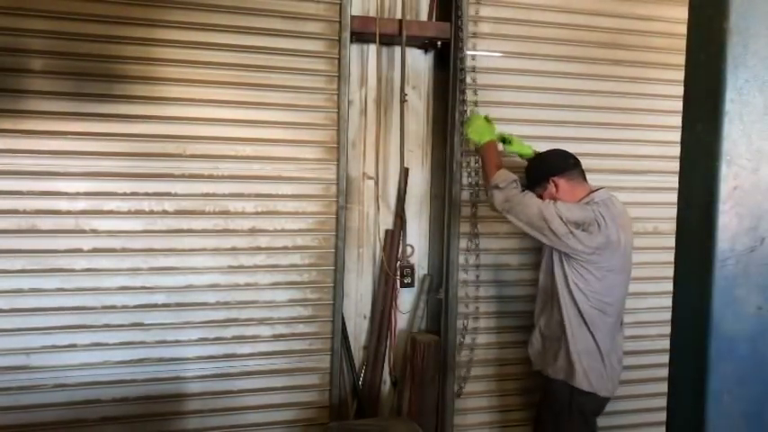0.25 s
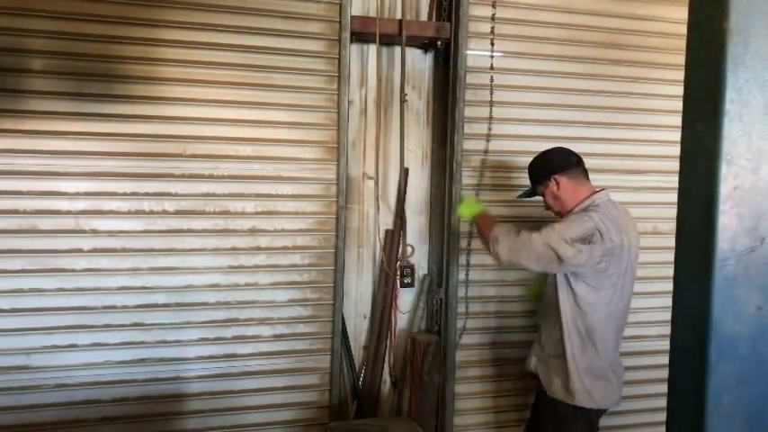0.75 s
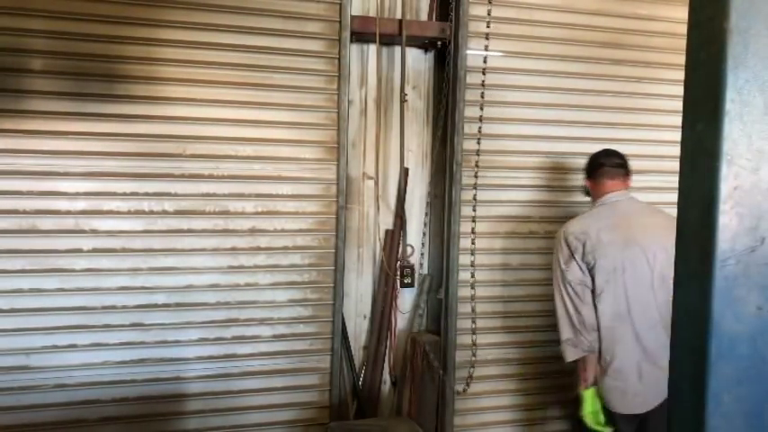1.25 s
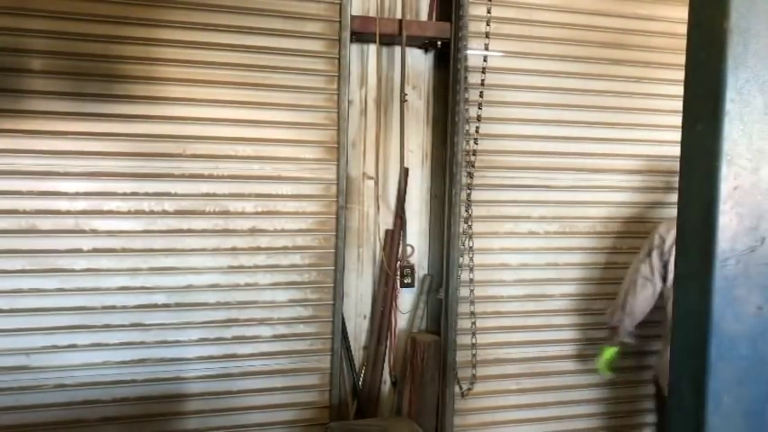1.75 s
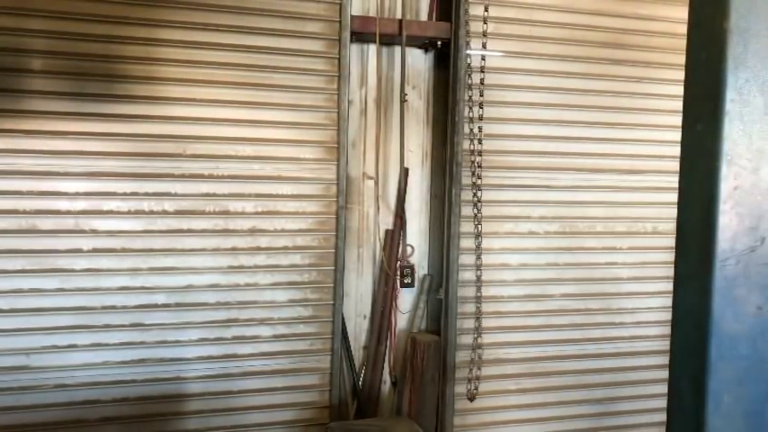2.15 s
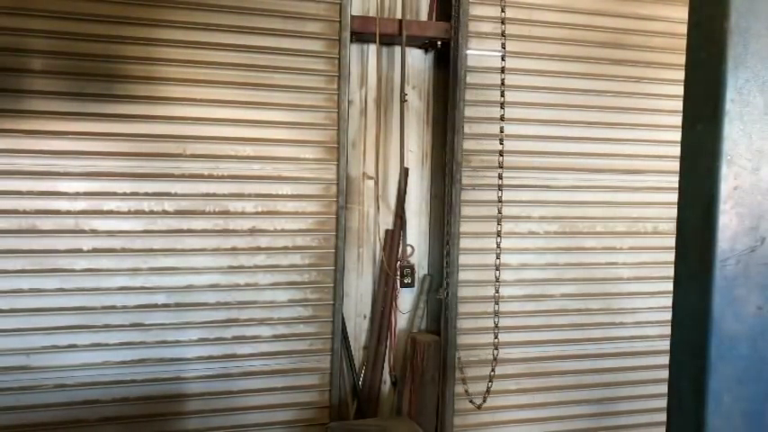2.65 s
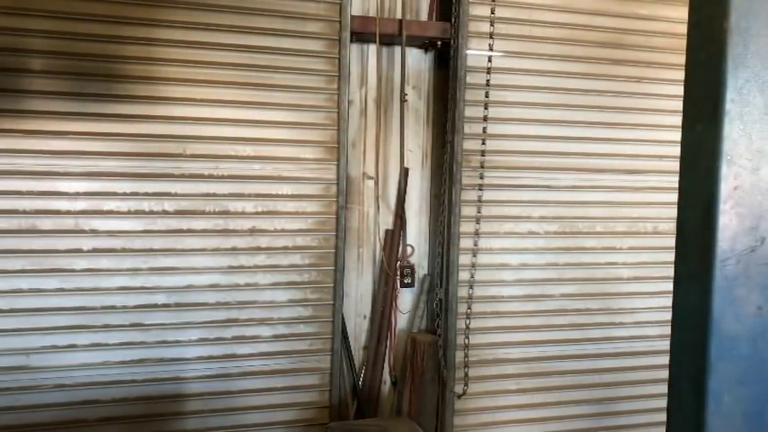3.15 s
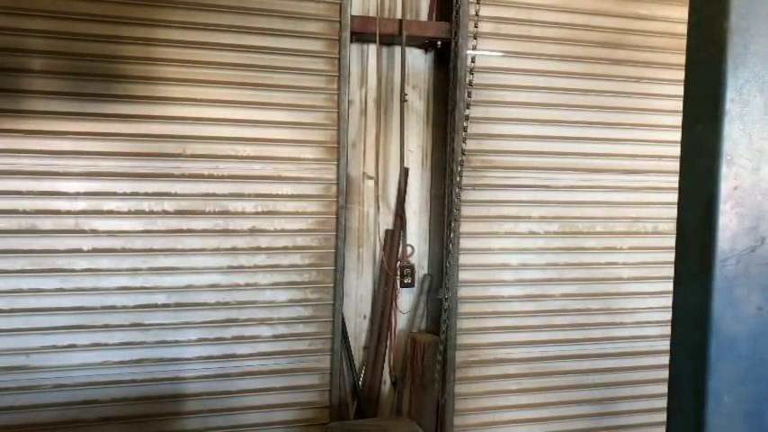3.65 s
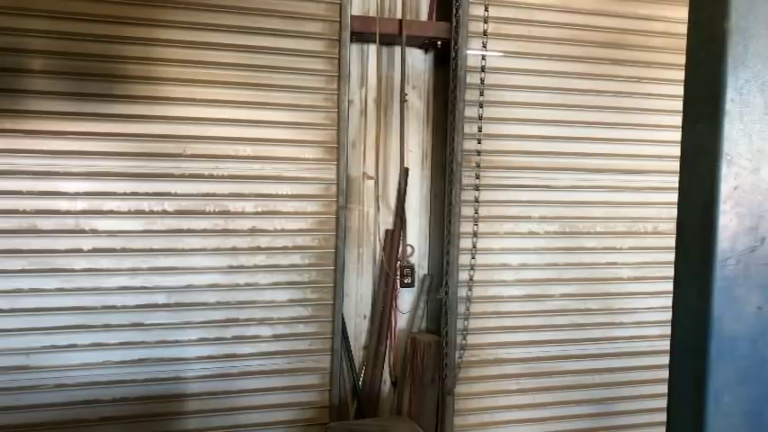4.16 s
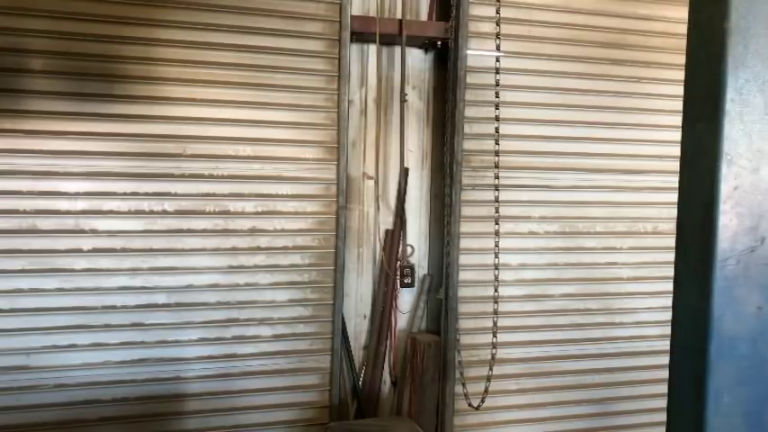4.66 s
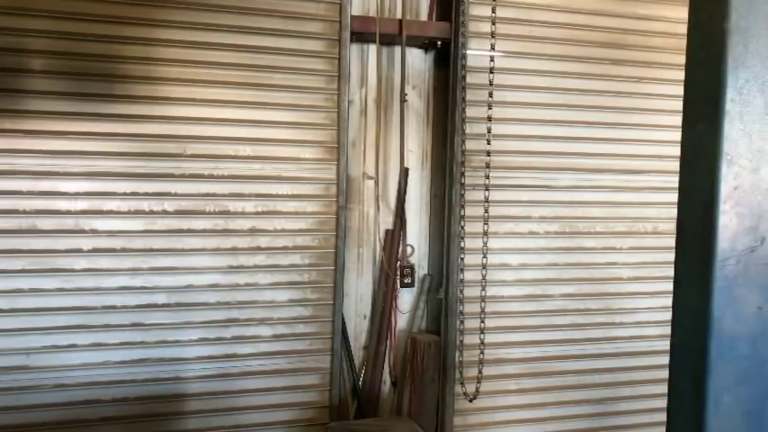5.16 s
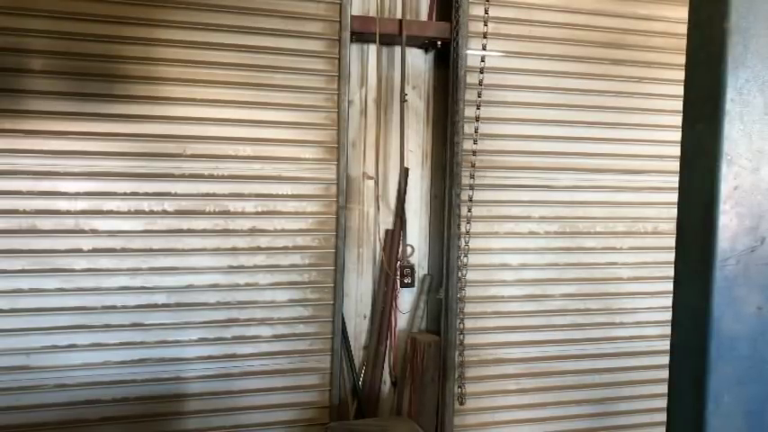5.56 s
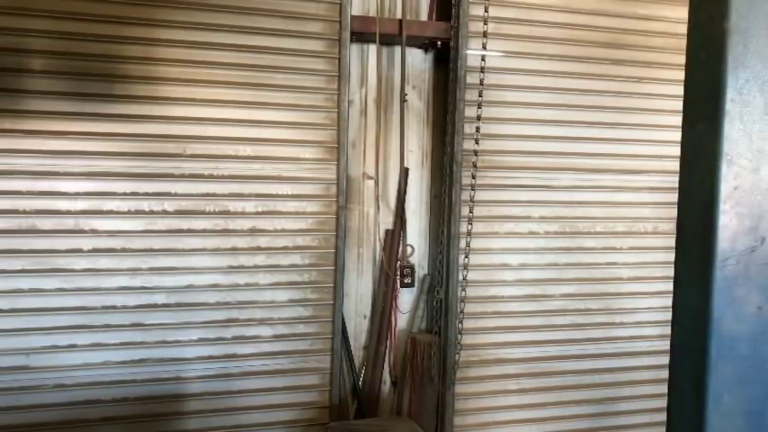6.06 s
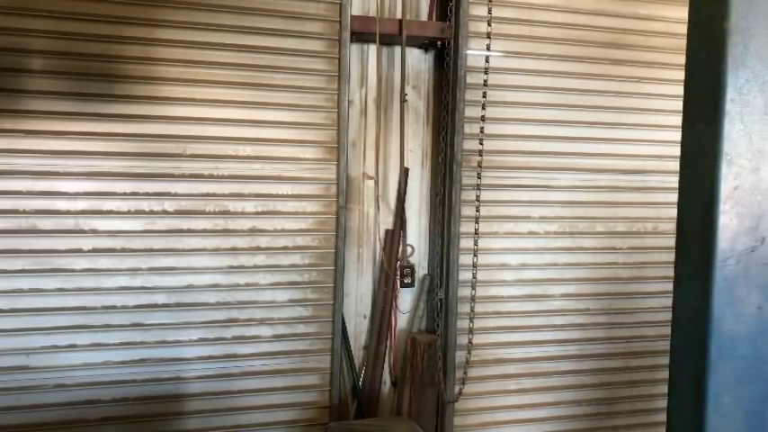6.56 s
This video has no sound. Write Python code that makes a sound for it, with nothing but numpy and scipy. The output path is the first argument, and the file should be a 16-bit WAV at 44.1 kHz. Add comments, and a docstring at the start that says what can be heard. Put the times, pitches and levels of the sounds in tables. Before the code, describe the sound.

Heavy metal shutter clatter fades quickly, a swinging chain gives isolated clanks in near quiet, then a booming microphone bump with small rattles ends it.

```python
"""A corrugated steel door, just hauled down, rumbles and settles: noise and knocks through sheet resonances.
Its loose hand chain swings on in an echoing garage: bursts of contacts slap the sheet, ring rail and links;
noise bursts through single resonances squeak, knock or swish, over a wavering sine hum and coloured air noise.
At the end a cut to a quiet shop: a hand bumps the microphone, whose mount wobbles as dying sines,
and something small rattles as short resonant noise bursts, over hiss."""
import sys
import numpy as np
from scipy import signal
from scipy.io import wavfile
from scipy.ndimage import uniform_filter1d

SR = 44100
rng = np.random.default_rng(int(sys.argv[2]) if len(sys.argv) > 2 else 0)


def file_out(sig):
    """Save sig as 16-bit WAV at sys.argv[1]."""
    # one column per channel
    cols = np.atleast_2d(sig).T
    # limit, then scale
    lim = np.clip(cols, -1, 1)
    pcm = np.round(lim * 32767).astype(np.int16)
    wavfile.write(sys.argv[1], SR, pcm)


def amplitude_ratio(level_db):
    """Convert a level in decibels to the matching linear amplitude (field) ratio."""
    exponent = np.asarray(level_db, float) / 20
    return 10 ** exponent


N = 300762

# shaking of the slats: [t/s, level/dB]
DOOR_SHAKE = [(0.0, -11.5), (0.09, -15.5), (0.16, -13.5), (0.27, -17), (0.38, -20), (0.5, -22),
              (0.57, -18.5), (0.66, -25.5), (0.79, -22), (0.9, -24.5), (1.19, -31), (1.3, -30),
              (1.55, -39.5), (1.71, -45), (1.83, -35), (1.94, -43.5), (2.03, -42), (2.12, -46)]
# spectrum of the heavy boom: [f/Hz, level/dB]
BOOM_SPECTRUM = [(8.8, -51), (15, -38), (34, -19.5), (59, -4), (92, -9), (172, -7.5), (200, -14),
                 (260, -34), (440, -120)]
# sheet resonances: [f/Hz, width/Hz, level/dB]
SLAT_MODES = [(162, 120, -1), (250, 15, 3.5), (316.4, 27, 0), (401, 43, -1), (546, 73, -1), (679, 115, 0),
              (747, 77, 1.5), (913, 110, -6), (1069, 35, -5)]
# spectrum of the clatter of slats and shivering links: [f/Hz, level/dB]
CLATTER_SPECTRUM = [(500, -24.5), (1100, 0.5), (2000, -3.5), (4000, -12), (7000, -23.5), (10500, -26),
                    (16000, -30)]
# chain against rail or door: [t/s, blow level/dB, sheet thud over blow/dB, length/s]
CHAIN_SLAPS = [(0.002, -14.5, -3, 0.045), (0.166, -22, 5.5, 0.042), (0.199, -21.5, 3, 0.011),
               (0.225, -18, 10, 0.037), (0.25, -26.5, 1, 0.022), (0.398, -28.5, 2, 0.2),
               (0.596, -34, 8, 0.045), (0.665, -27.5, 5.5, .012), (0.798, -29.5, -11, 0.037),
               (0.824, -21, 0, 0.064), (1.068, -44.5, 11, 0.015), (1.227, -45, 9.5, 0.028),
               (1.288, -49.5, 5, 0.025), (1.33, -46.5, 10, 0.014), (1.557, -48, 10, 0.051),
               (1.627, -54, -2, 0.077), (1.764, -41, -10.5, 0.014), (1.827, -52.5, 4, 0.019),
               (1.973, -52.5, 19, 0.011), (2.099, -50.5, -5.5, 0.035), (2.185, -52.5, -4, 0.061),
               (2.243, -50, 2, 0.034), (2.485, -23, -10, 0.071), (2.906, -49.5, 2, 0.035),
               (3.118, -46.5, 0, .07), (3.159, -51, 7.5, 0.053), (3.259, -45, 3, 0.0288),
               (3.415, -50, -1.5, 0.062), (3.464, -51.5, -5.5, 0.046), (3.562, -48.5, 5, .015),
               (3.61, -50, 2, 0.022), (3.717, -52, 6, 0.035), (3.74, -50.5, -3, 0.047),
               (3.779, -50.5, 6.5, 0.043), (3.933, -57.5, -1, 0.13), (4.021, -30, 0.5, 0.046),
               (4.064, -17, -1.5, 0.016), (4.079, -28.5, -8.5, 0.036), (4.507, -55, 9, 0.033),
               (4.638, -64.5, -2.5, 0.0276), (5.079, -54, -5.5, 0.05), (5.175, -66.5, -6.5, 0.06),
               (5.273, -60, -5.5, 0.045), (5.553, -64, 0, 0.049), (5.677, -60, 2, 0.058),
               (5.71, -53.5, 7, .015), (5.741, -33, -8.5, 0.052), (6.11, -55.5, -8, 0.068),
               (6.218, -61.5, 0.5, .06), (6.399, -63.5, -2.5, 0.075)]
# spectrum of the sheet's thud: [f/Hz, level/dB]
THUD_SPECTRUM = [(60, -36), (140, 5.5), (330, 1.5), (670, 6.5), (1100, 1.5), (1800, -39)]
# spectrum of the blow itself: [f/Hz, level/dB]
BLOW_SPECTRUM = [(800, -31), (1250, 3.5), (2400, 4.5), (3800, 3.5), (4750, 1), (6300, 0.5), (7600, -4.5),
                 (12000, -29.5)]
# spectrum of the blow's treble: [f/Hz, level/dB]
TREBLE_SPECTRUM = [(4000, -41.5), (7500, 3), (9000, 15), (10500, 8), (12500, 11), (15500, 3),
                   (17000, -15.5)]
# guide rail modes: [f/Hz, level/dB, t60/s]
RAIL_MODES = [(148, -17, .2), (178, -14, .2), (1355, -3, .09), (1560, -5, .05), (2090, -9, .07),
              (2440, -6, .06), (2520, -2, .09), (2665, -8, .07), (3424, -7, .07), (4050, -8, .05),
              (5405, -7, .05), (6060, -1, .04), (6380, -2, .04), (6580, -1, .04), (6855, -5, .05),
              (8785, 4, .09), (12290, -11, .03), (12880, -12, .03), (14800, -13, .03)]
# chain link modes: [f/Hz, level/dB, t60/s]
LINK_MODES = [(4200, -8.5, .2), (4800, -5.5, .2), (5600, -1.5, 0.11), (6490, -10, 0.14), (7030, -7, 0.14),
              (8100, -10, .25), (9150, -13.5, 0.34), (9850, -0.5, .18), (10740, -8.5, .25), (11360, 0, .2),
              (12200, -4.5, .3), (12650, -4, .25), (13370, -4.5, .12), (15000, -8.5, 0.13)]
# blows that ring the rail: [t/s, level/dB, length/s]
RAIL_BLOWS = [(1.768, -34.5, 0.018), (2.486, -21.5, 0.03), (4.066, -25.5, 0.026), (5.742, -26, 0.013)]
# links clinking together: [t/s, level/dB, length/s]
LINK_CLINKS = [(0.41, -32, 0.068), (0.605, -36, 0.029), (2.098, -44.5, 0.0068), (2.232, -53, 0.025),
               (3.71, -56.5, 0.0063), (4.03, -40, 0.032)]
# narrow squeaks and pings, plus broader booms, knocks and swishes of noise:
# [t/s, f/Hz, width/Hz, length/s, level/dB]
RESONANT_BURSTS = [(0.001, 7300, 59.2, .03, -28.5), (0.221, 4020, 200, 0.014, -18.5),
                   (0.236, 755, 250, 0.1, -21.5), (0.436, 12800, 120, .03, -42),
                   (0.826, 7240, 40.1, 0.037, -28), (1.055, 14000, 502, 0.058, -58.5),
                   (1.256, 13500, 497, 0.036, -50.5), (1.327, 13400, 500, 0.023, -44),
                   (1.378, 13800, 403, .03, -54), (1.977, 850, 598, .03, -36),
                   (2.004, 13800, 300, 0.021, -61.5), (3.147, 1657, 45, 0.051, -38),
                   (3.162, 1550, 60.1, 0.0945, -48.5), (3.249, 1680, 50, 0.013, -42),
                   (3.478, 1670, 71.7, 0.041, -49), (3.487, 3010, 100, .06, -53),
                   (3.5, 1455, 45, 0.013, -35.5), (3.534, 1580, 60, .04, -47),
                   (3.723, 450, 500, 0.035, -39), (3.797, 122, 30, .04, -40), (4.069, 2134, 602, .05, -26),
                   (4.077, 710, 196.2, 0.075, -31), (5.754, 148, 30, 0.074, -43)]
# garage reverberation: [f/Hz, t60/s]
GARAGE_DECAY = [(120, 1.9), (330, 1.39), (870, 0.71), (2300, 0.79), (6000, 0.55), (10000, 0.3),
                (15000, 0.24)]
# wobbles of the bumped microphone mount: [t/s, f/Hz, signed push, t60/s]
MOUNT_WOBBLES = [(6.655, 14.2, 0.4, 1.3), (6.656, 62, 0.94, 0.18), (6.655, 140, 0.013, .1),
                 (6.691, 43, -0.91, .15), (6.707, 84.3, 0.33, 0.44)]
# small rattles in the shop: [t/s, level/dB, length/s]
RATTLE_SHAKES = [(6.656, -37.5, 0.006), (6.661, -31.5, 0.0098), (6.693, -30, 0.0057), (6.701, -33.5, 0.01),
                 (6.735, -31, 0.0037), (6.742, -32, 0.01), (6.777, -33, .007)]
# resonances of the rattling thing: [f/Hz, width/Hz, level/dB]
RATTLE_MODES = [(1780, 170, 0), (1900, 120, 5.5), (2700, 1300, -9), (3360, 130, 0.5), (3710, 500, -8)]
# course of the hum: [t/s, f/Hz, level/dB]
HUM_COURSE = [(1.84, 69.3, -47), (2.1, 70.0, -58), (2.3, 71.7, -46), (3.06, 73.3, -54), (3.84, 73.5, -45.5),
              (3.87, 73.3, -53), (4.17, 75.2, -49), (4.77, 71.9, -54), (5.51, 71.9, -43),
              (6.39, 71.9, -52.5), (6.6, 77.4, -64.5)]
# spectrum of the building's air: [f/Hz, level/dB]
AIR_SPECTRUM = [(12, -32), (20, -13), (49, 0.5), (77, -2.5), (150, -8.5), (337, -9), (377, -14.5),
                (542, -13.5), (976, -15), (1810, -30.5), (4940, -42.5), (14700, -41.5), (16000, -49.5)]
# spectrum of the shop's hiss: [f/Hz, level/dB]
SHOP_SPECTRUM = [(100, -11.5), (230, 4.5), (380, -7), (600, -2), (820, -12.5), (1000, -35.5), (1500, -31),
                 (1900, -22), (4500, -21.5), (15500, -27), (17000, -33)]

LOUD_DB, SETTLE_DB_PER_S = -17.5, 27.5  # reference shake; fade after the last shake point
BOOM_DB, BOOM_FOLLOWS = -7, 0.87  # re slats at reference; dB per dB of shake
CLATTER_DB, CLATTER_FOLLOWS = -4, 1.31  # likewise; dies away sooner than the slats
LUMP_DB, LUMP_S = 2, 0.029  # rms swing and smoothing time of uneven contact
RISE_S = 0.002  # for a blow of -26 dB
TREBLE_DB, DULLING = -7, 0.79  # treble re blow; dB lost per dB of thud
SHIVER_DB, SHIVER_RISE_S, SHIVER_T60_S = -16.5, 0.1, 0.89  # links shiver on after a slap
SWAY_DB = -72  # idle chain
GARAGE_DB = -4  # tail re direct sound
AIR_DB, SHOP_DB = -51, -37.5
CUT_S, SHOP_S = 6.644, 6.654  # garage ends, shop begins
SIDE_DB, SIDE_HZ = -37, 9000


def evened(x):
    """Scales to rms 1."""
    return x / np.sqrt(np.mean(x ** 2) + 1e-20)


def read(points, hz):
    """Reads a table on a log-frequency axis."""
    f, value = np.transpose(points)
    return np.interp(np.log(hz + 1), np.log(f + 1), value)


def filtered(x, taps):
    """Convolves with unit-energy taps, so white noise keeps its rms."""
    return signal.oaconvolve(x, taps / np.linalg.norm(taps))[:len(x)]


def colour(x, points):
    """Minimum-phase filter from a spectrum in dB."""
    level_db = read(points, abs(np.fft.fftfreq(8192, 1 / SR)))
    log_gain = np.log(amplitude_ratio(np.maximum(level_db, -100)))
    spectrum = np.exp(log_gain - 1j * signal.hilbert(log_gain).imag)
    return filtered(x, np.fft.ifft(spectrum).real[:4096])


def resonate(x, peaks):
    """Sum of resonances with alternating sign; width sets the damping."""
    t = np.arange(8192) / SR
    taps = np.zeros(len(t))
    for k, (hz, width_hz, db) in enumerate(peaks):
        decay = np.exp(-np.pi * width_hz * t)
        taps += (-1) ** k * amplitude_ratio(db) * width_hz * decay * np.sin(2 * np.pi * hz * t)
    return filtered(x, taps)


def ring(x, modes):
    """Free modes of struck metal: dying sines."""
    t = np.arange(SR // 2) / SR
    return filtered(x, sum(amplitude_ratio(db - 60 * t / t60) * np.sin(2 * np.pi * hz * t) for hz, db, t60 in modes))


def clicks(per_s, spread_db, hiss):
    """Random contacts of uneven size; hiss is the power share of plain noise."""
    size = amplitude_ratio(spread_db * np.minimum(rng.exponential(1, N), 4)) * rng.standard_normal(N)
    train = evened(size * (rng.random(N) < per_s / SR))
    return np.sqrt(1 - hiss) * train + np.sqrt(hiss) * rng.standard_normal(N)


def burst(start_s, length_s, rise_s):
    """Envelope that rises linearly, holds and drops at the given length."""
    age = np.maximum(np.arange(N) / SR - start_s, 0)
    drop = np.exp(-np.minimum(age / max(length_s, 0.002), 9) ** 3)
    return np.minimum(age / rise_s, 1) * drop


def lumps():
    """Random gain: slats and links touch in uneven clumps."""
    size = int(LUMP_S * SR)
    wander = uniform_filter1d(uniform_filter1d(rng.standard_normal(N), size), size)
    return amplitude_ratio(LUMP_DB * evened(wander))


def door():
    """Slats knock on each other; the sheet booms, drones in its modes and clatters."""
    t = np.arange(N) / SR
    s, db = np.transpose(DOOR_SHAKE)
    settling_db = SETTLE_DB_PER_S * np.maximum(t - s[-1], 0)
    shake_db = np.interp(t, s, db) - settling_db - LOUD_DB
    knocks = clicks(per_s=1500, spread_db=1.5, hiss=0.55) * lumps()
    boom = colour(rng.standard_normal(N), BOOM_SPECTRUM)
    boom *= amplitude_ratio(LOUD_DB + BOOM_DB + BOOM_FOLLOWS * shake_db)
    body = resonate(knocks, SLAT_MODES) * amplitude_ratio(LOUD_DB + shake_db)
    clatter = colour(knocks, CLATTER_SPECTRUM)
    clatter *= amplitude_ratio(LOUD_DB + CLATTER_DB + CLATTER_FOLLOWS * shake_db)
    return boom + body + clatter


def strikes(hits):
    """Envelope of hard, fast-rising hits."""
    return sum(amplitude_ratio(db) * burst(s, length_s, rise_s=0.00027) for s, db, length_s in hits)


def chain():
    """Each slap is a shower of link contacts that drives the sheet; some hits ring the rail or the links."""
    blow, treble, thud, shiver = np.zeros((4, N))
    t = np.arange(N) / SR
    for s, db, thud_db, length_s in CHAIN_SLAPS:
        rise_s = RISE_S * amplitude_ratio(-0.4 * (db + 26))  # light brushes set in more slowly
        shower = burst(s, length_s, rise_s)
        blow += amplitude_ratio(db) * shower
        treble += amplitude_ratio(db + TREBLE_DB - DULLING * thud_db) * shower
        thud += amplitude_ratio(db + thud_db) * burst(s, length_s + 0.0072, rise_s=0.029)  # heavy sheet answers late
        age = np.maximum(t - s, 0)
        fading = amplitude_ratio(db + SHIVER_DB - 60 * age / SHIVER_T60_S)
        shiver = np.maximum(shiver, np.minimum(age / SHIVER_RISE_S, 1) * fading)
    blow += amplitude_ratio(SWAY_DB) * lumps()
    contacts = clicks(per_s=3000, spread_db=1.5, hiss=0.6)
    sheet = colour(blow * contacts, BLOW_SPECTRUM) + colour(thud * contacts, THUD_SPECTRUM)
    sheet += colour(treble * contacts, TREBLE_SPECTRUM)
    shivering = colour(shiver * lumps() * contacts, CLATTER_SPECTRUM)
    rail = ring(strikes(RAIL_BLOWS) * contacts, RAIL_MODES)
    links = ring(strikes(LINK_CLINKS) * contacts, LINK_MODES)
    return sheet + shivering + rail + links


def resonant_bursts():
    """Short noise bursts, each through one resonance of its own width: narrow ones squeak, broad knock or swish."""
    noise, out = rng.standard_normal(N), np.zeros(N)
    for s, hz, width_hz, length_s, db in RESONANT_BURSTS:
        envelope = burst(s, length_s, rise_s=0.002)
        sound = resonate(noise * envelope, [(hz, width_hz, 0)])
        out += amplitude_ratio(db) * sound * np.linalg.norm(envelope) / np.linalg.norm(sound)
    return out


def garage(x):
    """Direct sound plus a noisy tail whose bands die at their own speed."""
    hz, t, z = signal.stft(rng.standard_normal(3 * SR // 2), SR, nperseg=256)
    decay = amplitude_ratio(-60 * t / read(GARAGE_DECAY, hz)[:, None])
    tail = signal.istft(z * decay, SR, nperseg=256)[1]
    tail *= np.clip(np.arange(len(tail)) / SR / 0.012, 0, 1)  # echoes build up
    return x + amplitude_ratio(GARAGE_DB) * filtered(x, tail)


def bumps():
    """The bumped microphone mount wobbles: pushed, damped sines with a softened onset."""
    t = np.arange(N) / SR
    out = np.zeros(N)
    for s, hz, push, t60 in MOUNT_WOBBLES:
        age = np.maximum(t - s, 0)
        onset = 1 - np.exp(-age / 0.00032)
        out += push * amplitude_ratio(-60 * age / t60) * np.sin(2 * np.pi * hz * age) * onset
    return out


def rattles():
    """Short bursts of noise shake the resonances of something small."""
    shake = sum(amplitude_ratio(db - 1.5) * burst(s, length_s, rise_s=0.00091) for s, db, length_s in RATTLE_SHAKES)
    return resonate(shake * rng.standard_normal(N), RATTLE_MODES)


def hum():
    """Low sine of wavering pitch and level; phase is the running sum of frequency."""
    t = np.arange(N) / SR
    s, hz, db = np.transpose(HUM_COURSE)
    phase = 2 * np.pi * np.cumsum(np.interp(t, s, hz)) / SR
    return np.sqrt(2) * amplitude_ratio(np.interp(t, s, db)) * np.sin(phase)


def air():
    """Air of the building: steady coloured noise."""
    return amplitude_ratio(AIR_DB) * colour(rng.standard_normal(N), AIR_SPECTRUM)


def shop_hiss():
    """Quiet shop: steady coloured noise."""
    return amplitude_ratio(SHOP_DB) * colour(rng.standard_normal(N), SHOP_SPECTRUM)


def scene():
    """Garage first, a short gap, then the shop."""
    t = np.arange(N) / SR
    in_garage = door() + garage(chain() + resonant_bursts()) + hum() + air()
    in_shop = bumps() + rattles() + shop_hiss()
    garage_gate = np.clip((CUT_S - t) / 0.005, 0, 1)
    shop_gate = np.clip((t - SHOP_S) / 0.001, 0, 1)
    mono = in_garage * garage_gate + in_shop * shop_gate
    return np.array([mono, mono])


def roll_off(x):
    """The treble ends steeply here."""
    return signal.sosfilt(signal.butter(12, 15900, fs=SR, output="sos"), x)


def record(dry):
    """Nearly mono: delayed treble of opposite sign per channel; tanh rounds off peaks."""
    highpass = signal.butter(2, SIDE_HZ, "high", fs=SR, output="sos")
    side = signal.sosfilt(highpass, np.roll(dry[0], 300))
    wide = dry + amplitude_ratio(SIDE_DB) * np.array([side, -side])
    mix = 1.234 * np.tanh(wide / 1.348)
    return roll_off(mix)


dry = scene()
out = record(dry)
file_out(out)
```